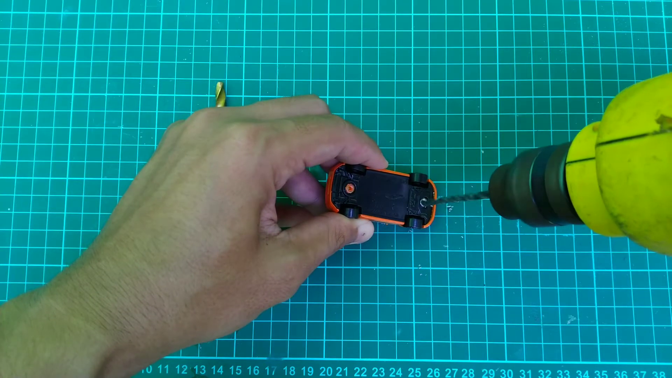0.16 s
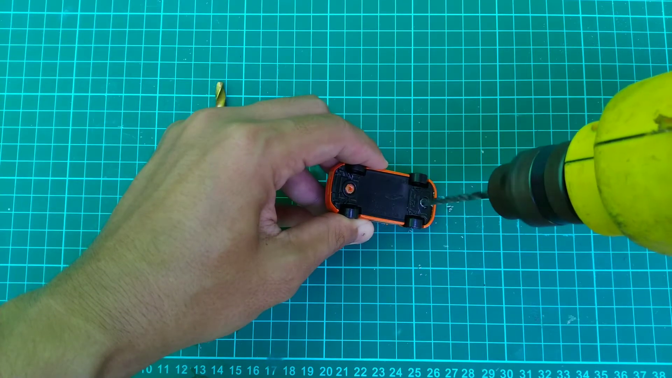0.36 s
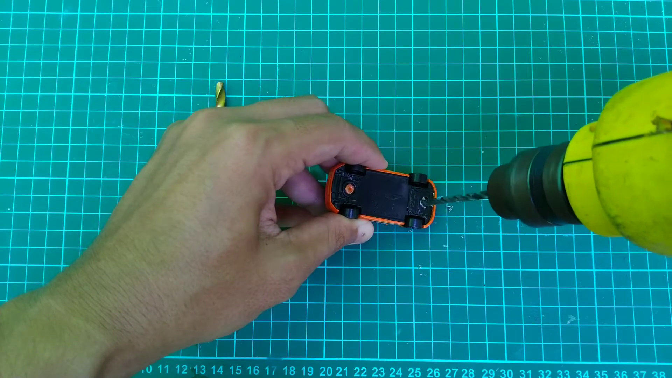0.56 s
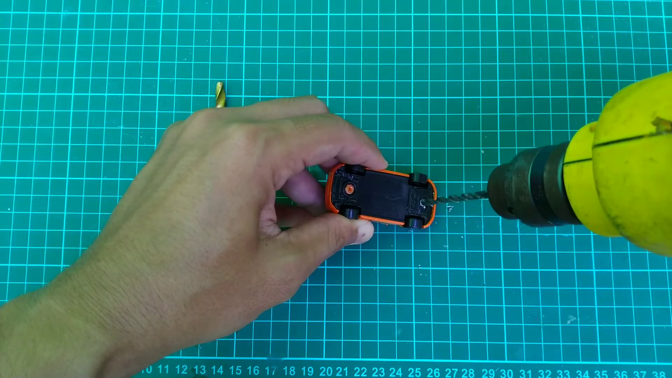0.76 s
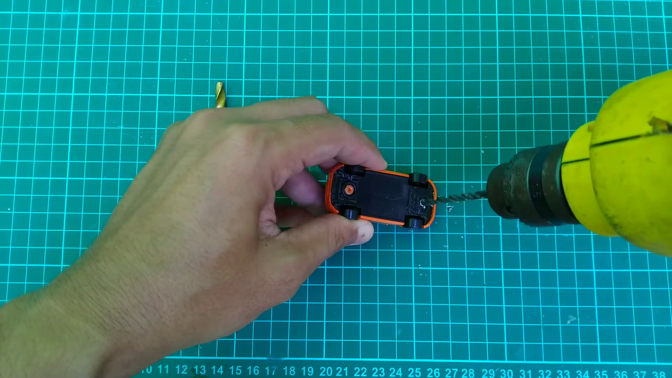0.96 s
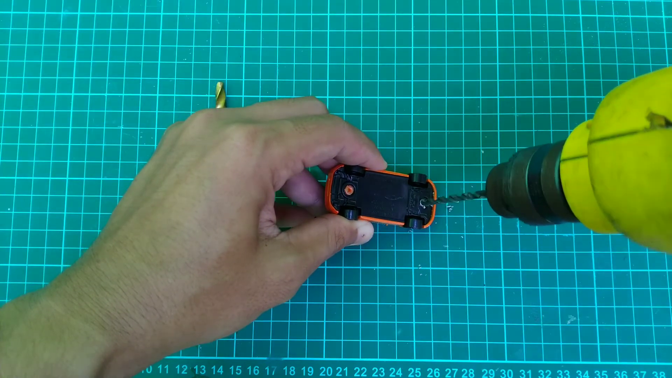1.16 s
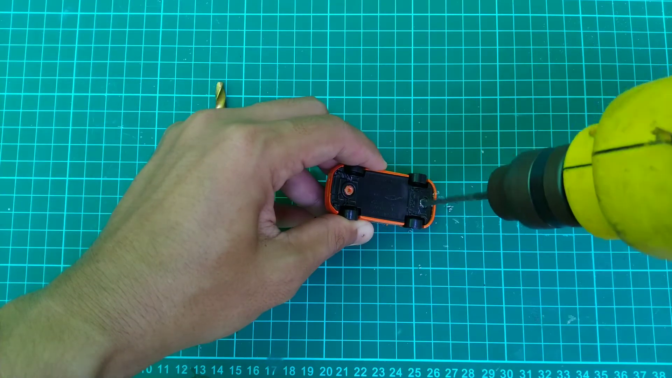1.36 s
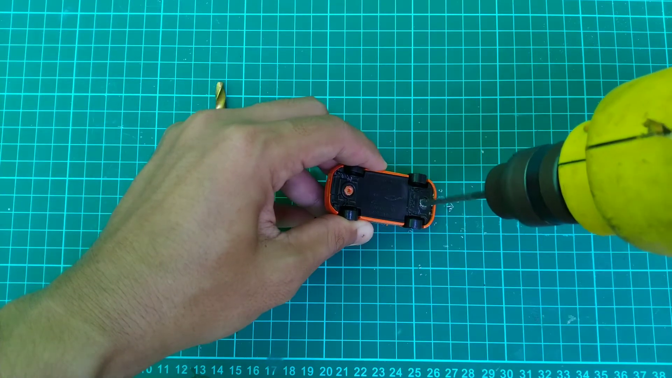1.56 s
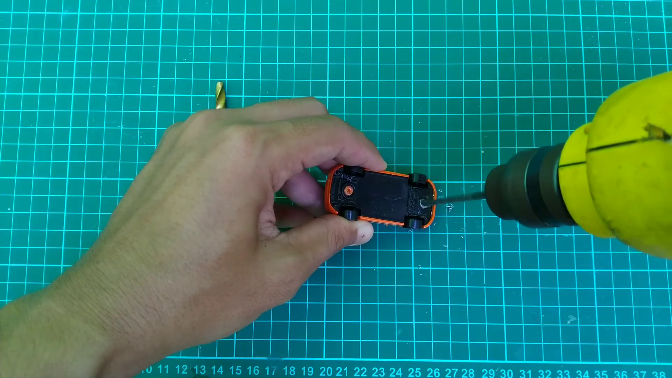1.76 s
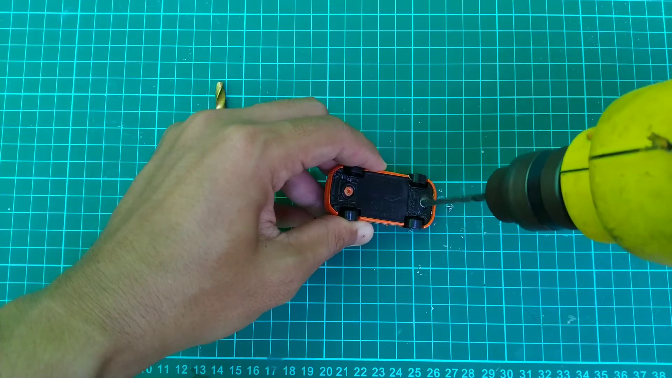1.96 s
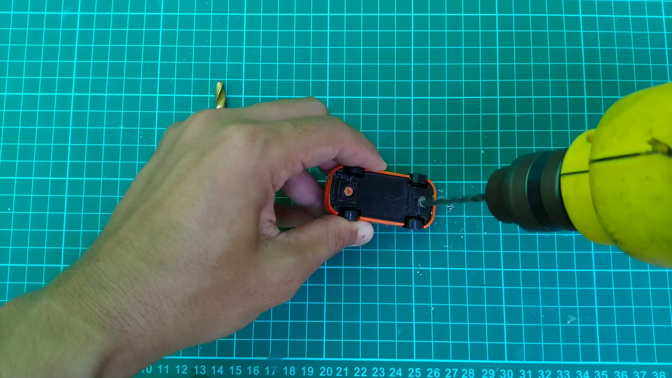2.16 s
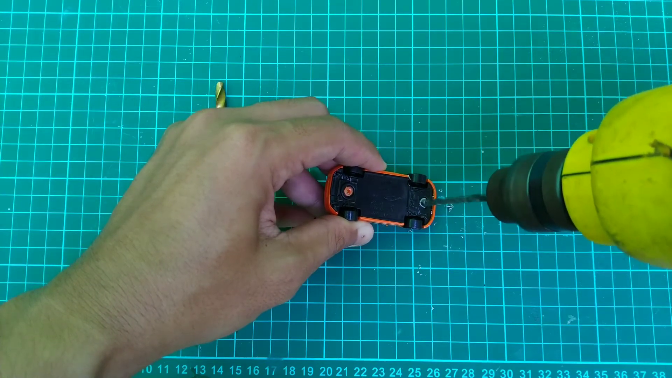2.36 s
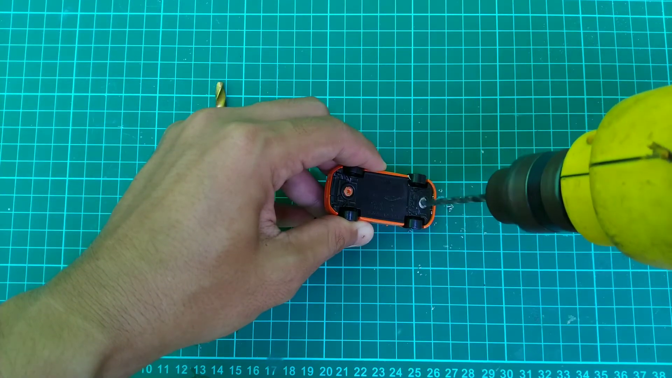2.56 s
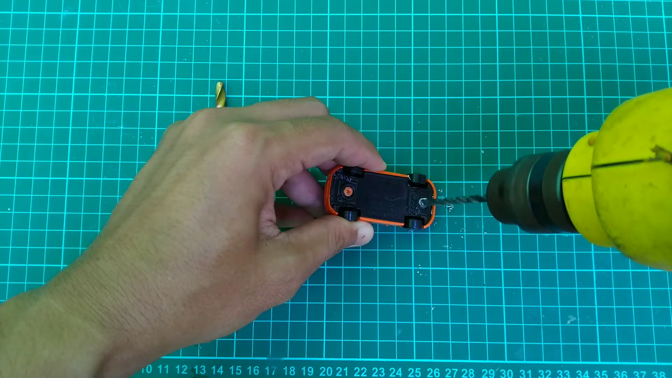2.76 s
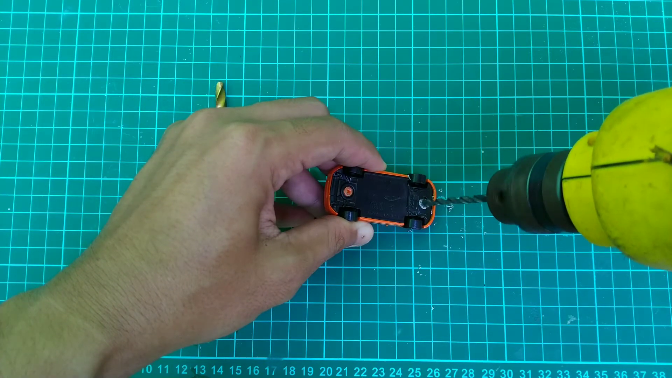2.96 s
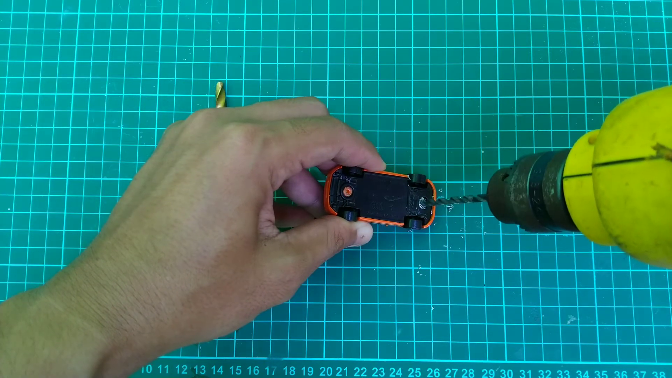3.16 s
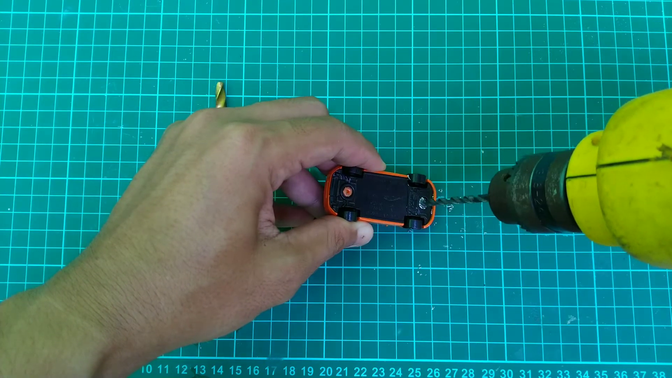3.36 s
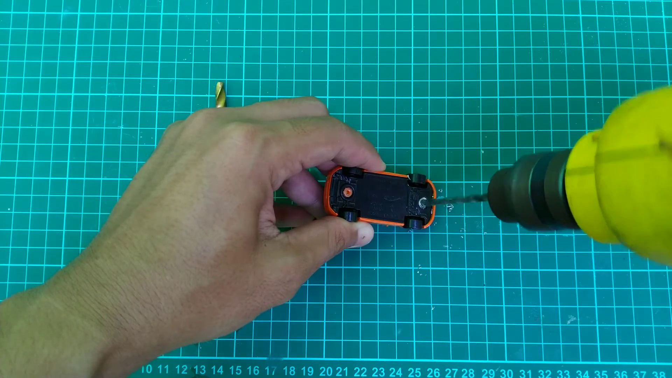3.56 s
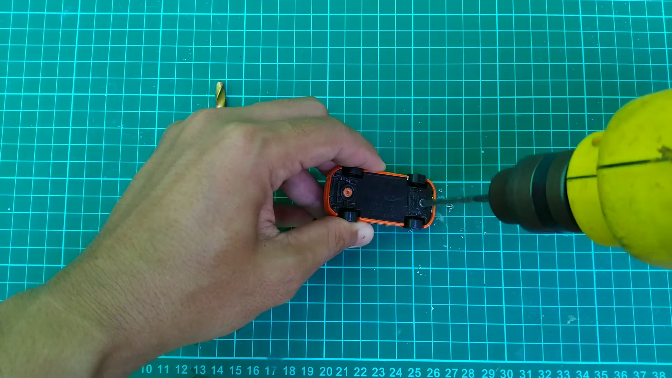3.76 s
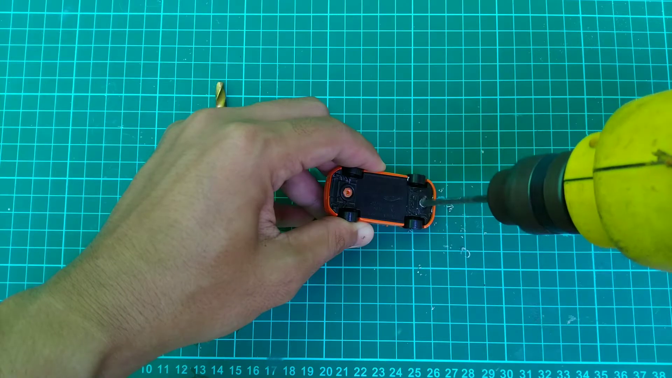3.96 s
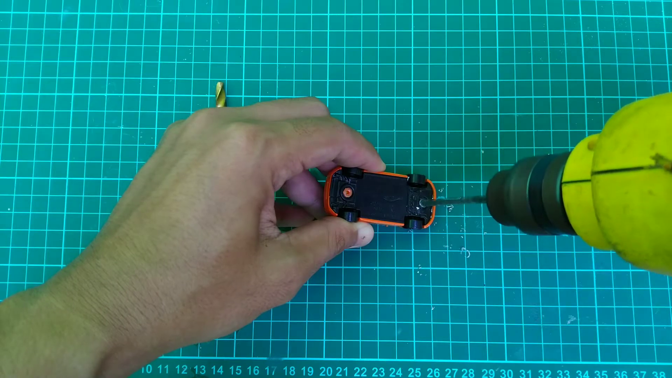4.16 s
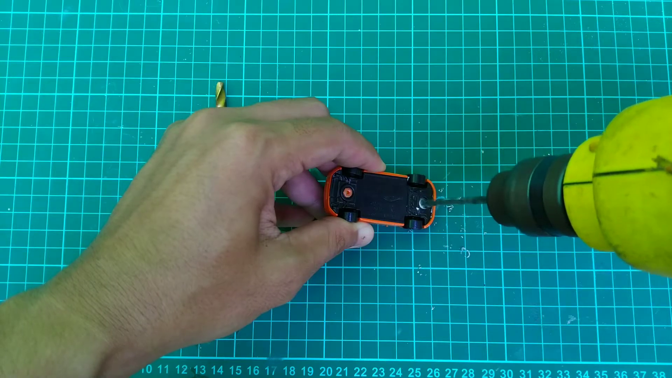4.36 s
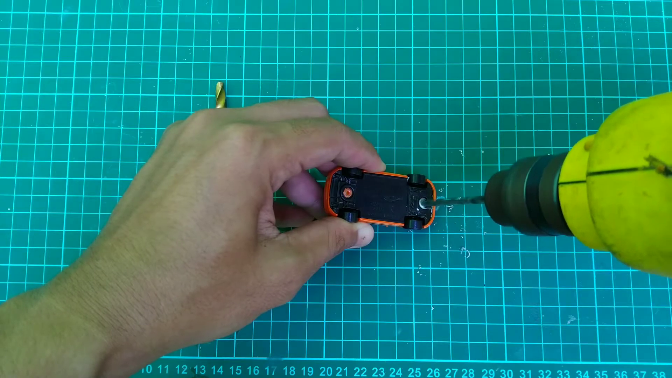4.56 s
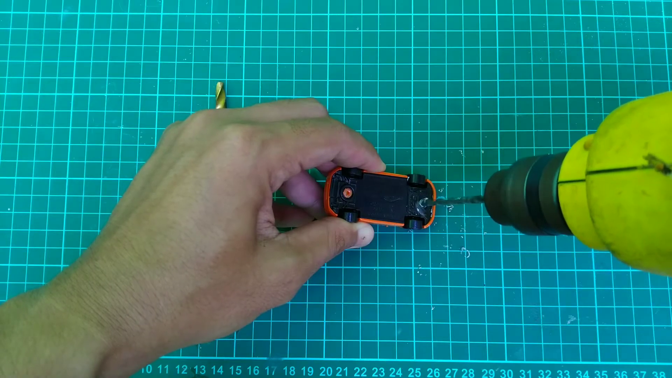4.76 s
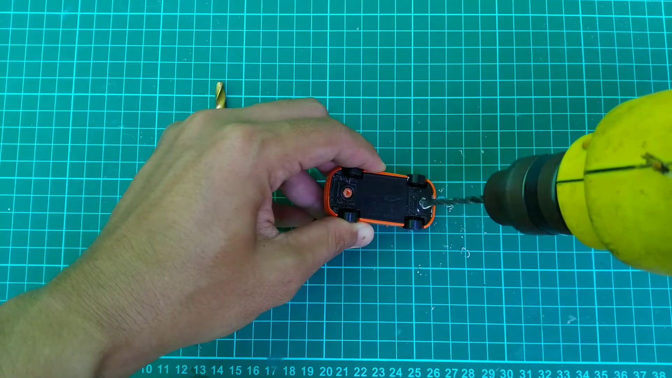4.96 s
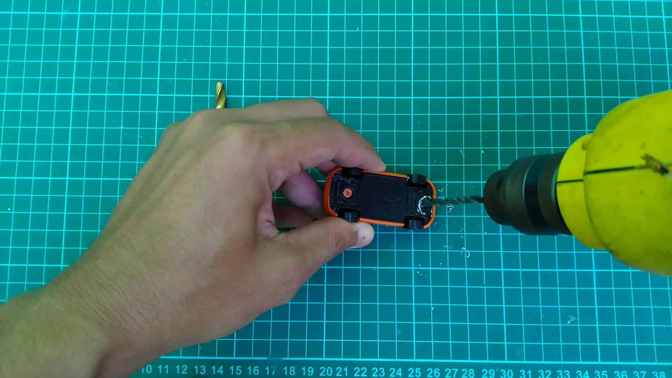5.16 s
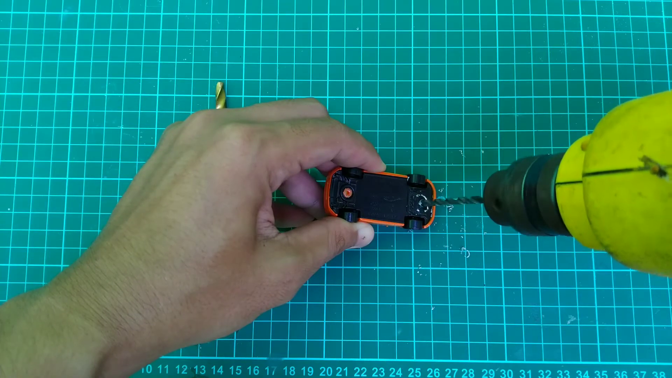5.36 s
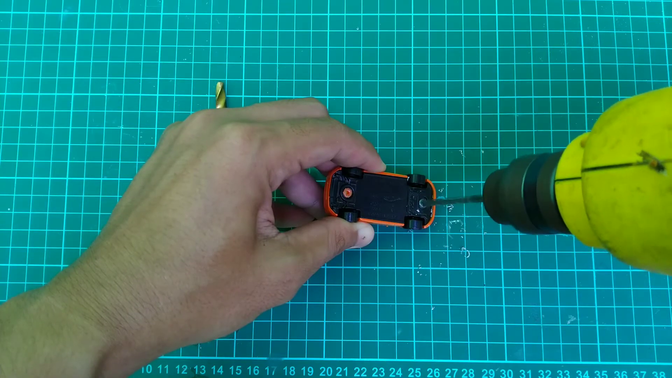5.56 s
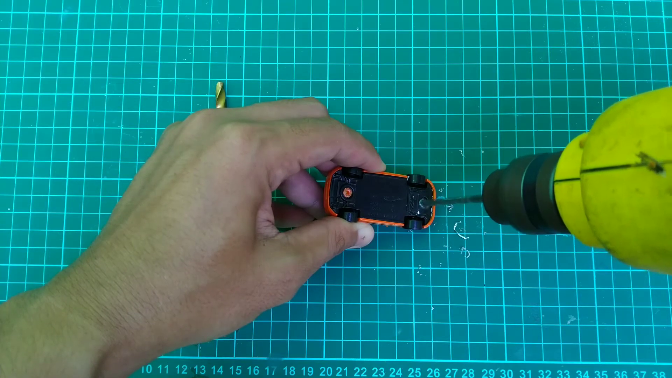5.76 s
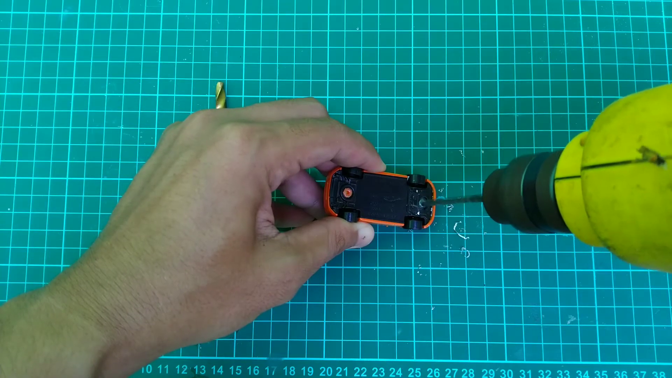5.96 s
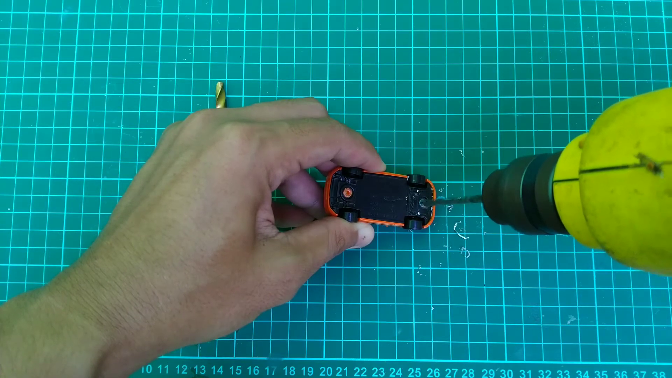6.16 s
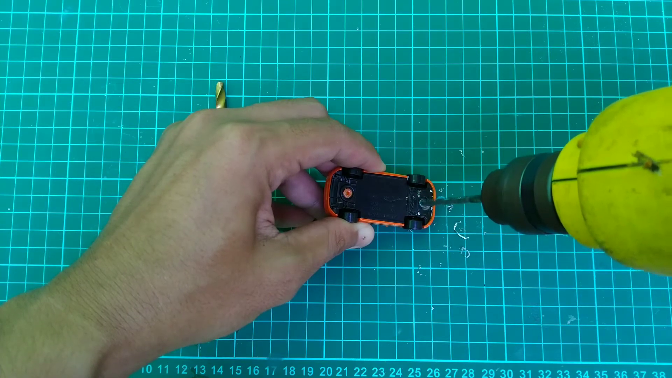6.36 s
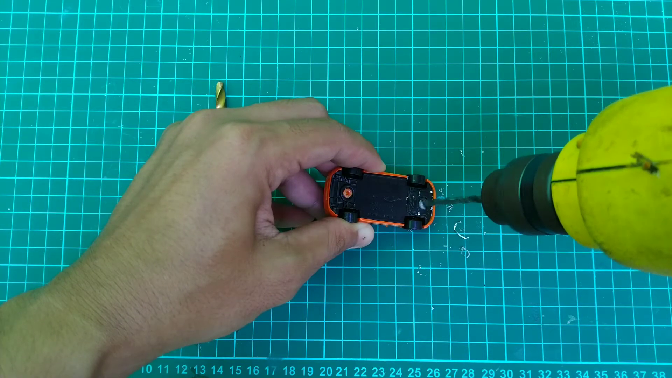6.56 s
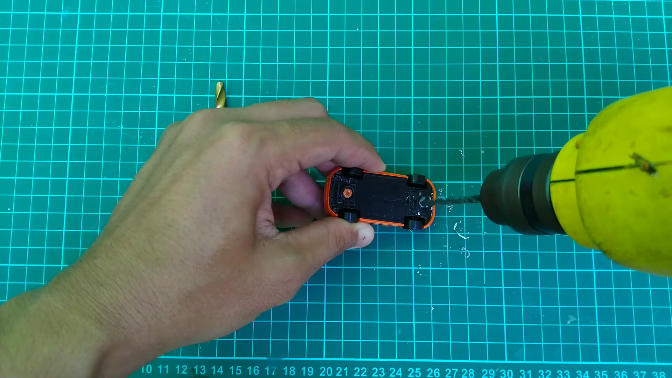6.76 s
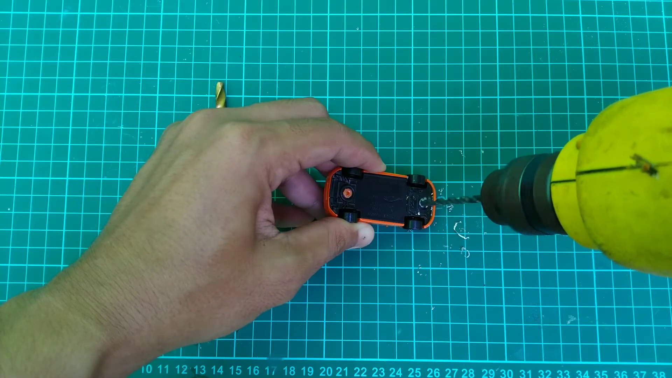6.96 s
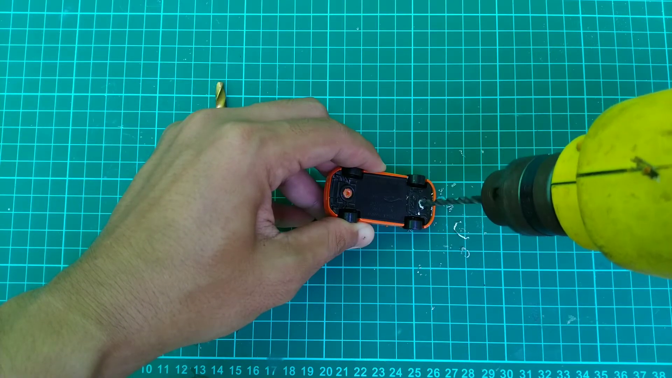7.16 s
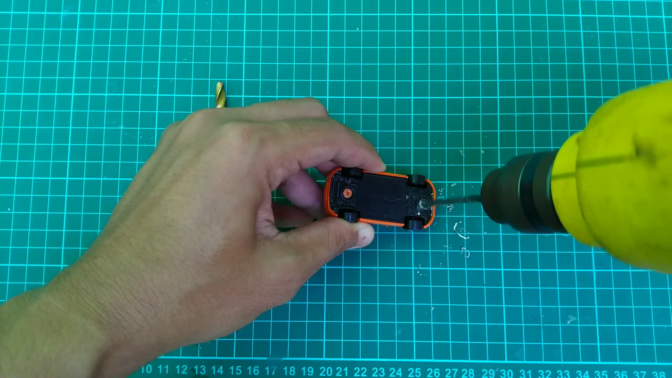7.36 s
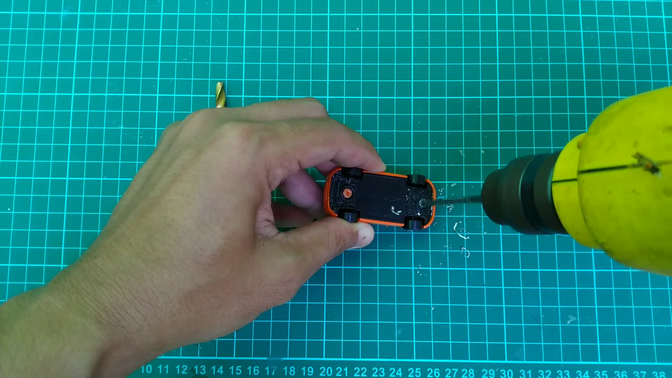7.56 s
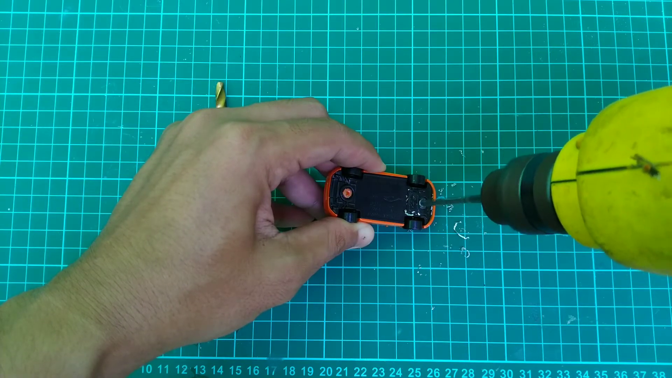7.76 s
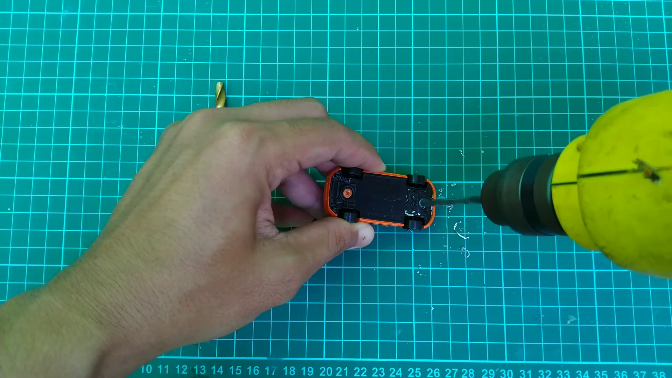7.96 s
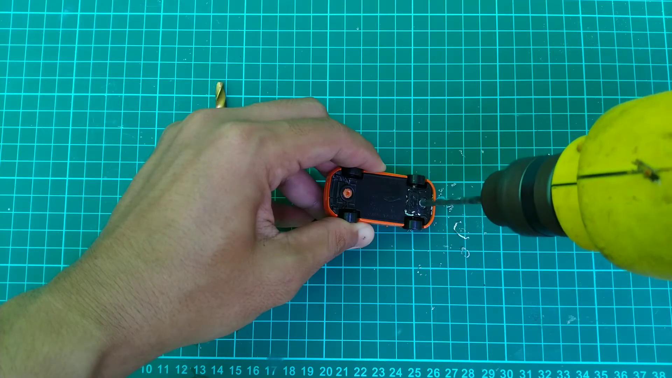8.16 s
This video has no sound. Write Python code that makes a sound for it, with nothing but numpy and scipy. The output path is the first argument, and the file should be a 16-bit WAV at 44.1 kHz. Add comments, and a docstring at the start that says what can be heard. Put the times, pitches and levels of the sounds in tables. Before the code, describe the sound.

A small electric drill is blipped four times, whining and rasping down each time as it cuts a toy car's rivet.

```python
"""A falling whine comes first: a small mains drill is coasting to rest on a work table, close to a phone.
It is then blipped four times and left to coast while its bit cuts a rivet. Tooth contact excites the
case at multiples of the shaft speed, over rasping gears and fan hiss. A low room hum lies underneath.
Trigger and chuck ticks ring the grip before each start, and the armature howls while current flows."""
import sys
import numpy as np
from scipy import signal
from scipy.fft import rfft, irfft, next_fast_len
from scipy.io import wavfile
from scipy.ndimage import uniform_filter1d, map_coordinates

SR = 44100
rng = np.random.default_rng(int(sys.argv[2]) if len(sys.argv) > 2 else 0)


def put_to_file(sound):
    """Save the sound as 16-bit audio at rate SR, in the file named by the first command-line argument."""
    columns = np.atleast_2d(sound).T  # one column per channel
    safe = np.clip(columns, -1, 1)
    whole_steps = np.round(safe * 32767)
    wavfile.write(sys.argv[1], SR, whole_steps.astype(np.int16))


N = 362061
TEETH, MAINS_HZ, TOP_HZ = 6, 50, 15750  # tooth contacts per shaft turn, supply frequency, band limit

# Trigger pulls. Each row: start, release and motor at rest in seconds; relative levels of the starting
# jolt and the rasp in dB; dip as the gears go slack in dB; recovery time in seconds.
PULLS = [(1.253, 1.388, 3.195, -31.5, -17.5, -3.5, 0.24), (3.636, 3.788, 5.5, -27.5, -17, -4, 0.035),
         (5.551, 5.682, 7.31, -31.5, -17, -2, 0.031), (7.387, 7.528, 9.17, -25.5, -17, -2.5, 0.057)]


def amp(db):
    """Decibels as an amplitude ratio."""
    return 10 ** (np.asarray(db) / 20)


def unit(x):
    """Normalisation to an rms of one."""
    return x / np.sqrt(np.mean(x ** 2) + 1e-20)


def along(points, hz, column=1):
    """Interpolation of one table column on a logarithmic frequency axis."""
    table = np.array(points, float)
    return np.interp(np.log(hz + 1), np.log(table[:, 0] + 1), table[:, column])


def wobble(rate):
    """Smooth random modulation: a spline through rate knots a second."""
    return map_coordinates(rng.standard_normal(int(N * rate / SR) + 4), [np.arange(N) * rate / SR])


def filtered(x, response):
    """Linear filtering: the spectrum of x times a complex frequency response."""
    size = next_fast_len(N + SR // 2)
    return irfft(rfft(x, size) * response(np.fft.rfftfreq(size, 1 / SR)), size)[..., :N]


def patchy(channels, depth_db):
    """White noise modulated in random patches of time and frequency."""
    spectra = signal.stft(rng.standard_normal((channels, N)), nperseg=512)[2]
    field = uniform_filter1d(uniform_filter1d(rng.standard_normal(spectra.shape[1:]), 6, 0), 8, 1)
    return unit(signal.istft(spectra * amp(depth_db * unit(field)), nperseg=512)[1][:, :N])


def motor():
    """Inertia smooths spin-up and coast: mesh rate in Hz, spin-up progress and torque (0 if coasting)."""
    # One list per coast. Each point: time in seconds, mesh frequency in Hz.
    coasts = [
        [(0, 525), (.17, 420), (.45, 252)],
        [(1.42, 1212), (1.84, 923), (2.24, 636), (2.63, 372), (2.85, 228)],
        [(3.85, 1276), (4.17, 1025), (4.6, 686), (4.97, 410), (5.17, 264)],
        [(5.7, 1230), (6.1, 912), (6.41, 657), (6.74, 414), (6.97, 250)],
        [(7.54, 1262), (7.73, 1104), (7.95, 923), (8.21, 708)],
    ]
    t = np.arange(N) / SR
    knots = list(coasts[0]) + [(.84, 0)]  # the opening coast comes to rest
    for (on, off, rest, *_), coast in zip(PULLS, coasts[1:]):
        (t0, hz0), (t1, hz1) = coast[:2]
        release_hz = hz0 + (hz1 - hz0) / (t1 - t0) * (off - t0)
        knots += [(on, 0), (off, release_hz)] + list(coast) + [(rest, 0)]
    mesh = np.interp(t, *np.transpose(knots))
    progress, torque = np.zeros((2, N))
    for on, off, *_ in PULLS:
        up = (t >= on) & (t < off)
        rise = 1 - np.exp(-(t[up] - on + .002) / .08)
        mesh[up] = mesh[round(off * SR) + 1] * rise / rise[-1]
        progress[up] = (t[up] - on) / (off - on)
        beat = np.cos(4 * np.pi * MAINS_HZ * (t[up] - off + .007))  # two torque peaks per mains cycle
        torque[up] = (1 + np.sqrt(progress[up]) * beat) * np.clip(progress[up] / .08, 0, 1)
    return mesh, progress, uniform_filter1d(torque, size=60)


def excitation(mesh, slack_s=.044, handover_s=.027):
    """Amplitude envelopes of rasp, hiss and drone: a jolt, a spin-up, then a decline with speed."""
    # Each row: time since the pull in seconds, rasp in dB re its level, hiss and drone in dB re rasp.
    spin_up = [(0.003, -17.5, -7.5, 1), (0.014, -5, -11, 2), (0.04, -0.6, -9.5, -10),
               (0.09, 1.1, -6.5, -16), (0.14, 1.4, -8.5, -14)]
    # Each row: mesh frequency of the coast in Hz, then the same three gains in dB.
    slowing = [(0, -55.5, 0, 10), (49, -33, -10.5, 1), (179, -15.5, -13.5, -4.5), (330, -10.5, -12, -10),
               (517, -7, -10, -10), (708, -4, -9, -18), (902, -1.5, -8, -18), (1250, 1.14, -7, -16)]
    t = np.arange(N) / SR
    hz, *by_speed = np.transpose(slowing)
    after, *by_time = np.transpose(spin_up)
    db = np.array([np.interp(mesh, hz, column) for column in by_speed])
    level_db, jolts = np.full(N, -18.), np.zeros((3, N))
    for on, off, _, jolt_db, run_db, slack_db, recover_s in PULLS:
        started = t >= on
        driven = started * np.clip(1 + (off - t) / handover_s, 0, 1)
        driven_db = np.array([np.interp(t - on, after, column) for column in by_time])
        db += driven * (driven_db - db)
        # the gears lose their load just before the release
        slack = np.exp(-np.where(t < off, ((off - t) / slack_s) ** 4, (t - off) / recover_s))
        level_db[started] = run_db + slack_db * slack[started]
        jolts += started * amp(jolt_db - 60 * np.abs(t - on) / .081 + np.array([[0], [-8], [-8]]))
    rasp_db = level_db + db[0]
    return amp([rasp_db, rasp_db + db[1], rasp_db + db[2]]) + jolts


def shaft_order(multiple, turns):
    """A harmonic of the shaft rotation, at a random phase."""
    return np.sin(2 * np.pi * (multiple * turns + rng.random()))


def tilt_db(mesh):
    """Spectral tilt per shaft order: high harmonics fade first as the motor slows."""
    return -.9 * np.log(np.minimum(mesh / 1050, 1) + .01) ** 2


def gear_whine(mesh, turns, clearest_hz=850):
    """Periodic tooth contact gives a harmonic series, which recedes into the rasp at high speed."""
    # Each row: multiple of the shaft speed, relative level in dB.
    orders = [(1, -17), (3, -24), (6, -14), (9, -23), (12, -13), (18, -16), (22, -20), (24, -12.5),
              (25, -21), (27, -22), (28, -19), (30, -20), (31, -21), (34, -22), (36, -20), (43, -21)]
    tilt = tilt_db(mesh)
    cover_db = -20 * np.log(np.maximum(mesh / clearest_hz, 1)) ** 2
    return amp(cover_db) * sum(amp(db + max(k - 12, 2) * tilt + 2 * wobble(18)) * shaft_order(k, turns)
                               for k, db in orders)


def backlash(mesh, turns, coasting, knocks_per_turn=6):
    """Impacts across the tooth clearance modulate the noise, standing out as the motor slows."""
    beats = knocks_per_turn * turns
    since_s = (beats % 1) * TEETH / knocks_per_turn / (mesh + 1)
    strength = amp(3 * rng.standard_normal(int(beats[-1]) + 2))[beats.astype(int)]
    knocks = 1 + 4 * strength * np.exp(-since_s / .0015) * np.exp(-mesh / 200) * coasting
    grit = knocks * amp(.83 * wobble(600) + .61 * wobble(40))
    return grit / np.sqrt(uniform_filter1d(grit ** 2, size=4000))


def case_resonance_db(hz):
    """The modes of the case add narrow peaks to its response."""
    # Each row: centre in Hz, bandwidth in Hz, peak height in dB.
    modes = [(547, 60, 8), (720, 40, 3), (1670, 110, 3.5), (2090, 150, 6), (3130, 130, 4), (4850, 300, 2.5)]
    return sum(db / (1 + (2 * (hz - centre) / width) ** 2) for centre, width, db in modes)


def path_phase(hz, ear):
    """Propagation through case and air delays the right microphone (ear 1) behind the left (ear 0)."""
    # Each row: frequency in Hz, phase lag in radians.
    lags = [(0, 0), (500, .4), (1000, 2.1), (1460, 3), (2670, 9.5), (4820, 18.8), (8000, 31)]
    return np.exp(-1j * ear * np.interp(hz, *np.transpose(lags)))


def case_radiation(shake, sway, mesh, ear):
    """Forced vibration: the case radiates shake as middle and treble rasp, sway as a low drone."""
    # Response toward each microphone. Each row: frequency in Hz, relative gain in dB.
    left = [(100, -20.5), (400, -17.5), (550, -12.5), (800, -10.5), (1100, -9), (1350, -10.5), (1680, -0.5),
            (1900, -8), (2150, -4), (2500, -3), (3100, -5), (4000, -15), (4900, -3.5), (6500, -8.5),
            (7500, -27.5)]
    right = [(100, -24), (400, -19.5), (550, -16), (800, -10.5), (1100, -10.5), (1500, -10), (1850, -4.5),
             (2120, -1), (2400, -6.5), (2700, 0), (3150, -6), (4150, -3), (5000, -9.5), (6500, -11.5),
             (7500, -37.5)]
    colour = lambda hz: unit(amp(along((left, right)[ear], hz) + case_resonance_db(hz) - 60 * (hz > 8000)))
    low = lambda hz: 1 / (1 + (hz / 1300) ** 8)
    high = lambda hz: 1 - 1 / (1 + (hz / 3800) ** 6)
    bright = ((mesh + 150) / 950) ** .34  # faster teeth strike brighter
    middle = filtered(shake / bright, lambda hz: colour(hz) * (1 - low(hz)) * (1 - high(hz)))
    treble = filtered(shake * bright, lambda hz: colour(hz) * high(hz))
    bass = filtered(sway, lambda hz: colour(hz) * low(hz))
    return .83 * (middle + treble) + amp(12) * bass


def fan_tones(mesh, turns):
    """Rotation puts thin harmonics into the hiss of the fan."""
    # Each row: multiple of the shaft speed, level in dB re the hiss.
    orders = [(48, -18), (72, -20)]
    tilt = tilt_db(mesh)
    return sum(amp(db + k * tilt / 2 + 3 * wobble(18)) * shaft_order(k, turns) for k, db in orders)


def fan_hiss(gain, grit, tones, ear):
    """Broadband flow noise and the fan's tones, confined to the high treble."""
    # Each row: frequency in Hz, relative gain to the left and to the right in dB.
    spectrum = [(6780, -25, -21.5), (7200, -18, -1), (9620, -1, -6.5), (10700, 1, -1.5), (12800, 3, -2),
                (13940, 4.5, -6), (16300, -19, -3.5)]
    air = (patchy(channels=1, depth_db=3)[0] * grit ** .37 + tones) * gain
    stopband = lambda hz: (hz < 6500) | (hz > TOP_HZ)
    return filtered(air, lambda hz: unit(amp(along(spectrum, hz, column=ear + 1) - 60 * stopband(hz))))


def drill():
    """Superposition of gears, fan and armature on one shaft, partly coherent between the microphones."""
    mesh, progress, torque = motor()
    rasp, hiss, drone = excitation(mesh)
    turns = np.cumsum(mesh / TEETH) / SR
    coasting = progress == 0
    whine = coasting * gear_whine(mesh, turns)
    howl = armature_howl(turns, progress, torque)
    tones = coasting * fan_tones(mesh, turns)
    grit = backlash(mesh, turns, coasting)
    common, *own = patchy(channels=3, depth_db=1.01) * grit
    out = []
    for ear, gain_db in enumerate((3.2, 2.4)):
        # share: the fraction of the noise power common to both microphones
        coherent = lambda share: filtered(whine + np.sqrt(share) * common, lambda hz: path_phase(hz, ear))
        shake, sway = (coherent(share) + np.sqrt(1 - share) * own[ear] for share in (.35, .8))
        gears = case_radiation(shake * rasp, sway * drone, mesh, ear)
        fan = amp(.45) * fan_hiss(hiss, grit, tones, ear)
        out.append(amp(gain_db) * (gears + howl[ear] + fan))
    return np.array(out)


def room_hum():
    """Partly coherent rumble and wavering tones; the bass is in near antiphase between the channels."""
    # Each row: time in seconds, relative rumble level in dB.
    swell = [(0.0, -49), (0.4, -39.5), (1.5, -42), (2.0, -46), (3.15, -41), (3.6, -48.5), (4.6, -56.5),
             (5.5, -37.5), (6.7, -48), (7.3, -38), (8.21, -47.5)]
    # Each row: frequency in Hz, relative spectral density in dB.
    spectrum = [(15, -34), (25, 9.5), (69, -3.5), (164, -8), (313, -13), (430, -14), (560, -21),
                (850, -34.5), (1380, -38), (6730, -43), (7910, -43), (9050, -47.5), (15500, -40.5)]
    # Each row: frequency in Hz, left-right correlation before the right channel is inverted.
    correlation = [(60, 0.79), (200, 0.93), (600, 0.55), (1300, 0.051)]
    # Each row: frequency of a tone in Hz, relative level in dB.
    drones = [(86, -61), (162, -53), (300, -66)]
    t = np.arange(N) / SR
    angle = lambda hz: np.arccos(np.clip(along(correlation, hz), -1, 1)) / 2
    response = lambda hz: amp(along(spectrum, hz)) * [np.cos(angle(hz)), np.sin(angle(hz))]
    mid, side = filtered(patchy(channels=2, depth_db=-2.5), response)
    rumble = amp(np.interp(t, *np.transpose(swell))) * unit(np.array([mid + side, mid - side]))
    tones = sum(amp(db + 2.8 * wobble(6.2)) * np.sin(2 * np.pi * hz * t + 1.7 * wobble(6.3))
                for hz, db in drones)
    return (rumble + tones) * amp([[.7], [-.7]])


def trigger_ticks(right_lag_samples=17):
    """Impulse excitation: each trigger or chuck tick cracks and rings the modes of the plastic grip."""
    # Each row: start in seconds, relative level in dB.
    ticks = [(.806, -29), (.823, -27.5), (.957, -27.5), (1.08, -31), (1.108, -30.5), (1.221, -28),
             (1.232, -32), (3.479, -30), (3.517, -32.5), (3.548, -33.5), (3.571, -41), (3.596, -36),
             (3.619, -30.5), (5.469, -30), (5.501, -38), (5.518, -32), (7.194, -47.5), (7.209, -38),
             (7.25, -28), (7.31, -47), (7.332, -27), (7.356, -36), (7.375, -33)]
    # Each row: mode frequency in Hz, relative level in dB, time to decay by 60 dB in seconds.
    modes = [(680, -2, .022), (1150, -4, .015), (1630, -1, .016), (2150, -3, .015), (2700, -5, .015),
             (3550, -4, .015), (4100, -8, .012), (5400, -10, .01)]
    out, t = np.zeros((2, N + SR)), np.arange(SR // 10) / SR
    attack = 1 - np.exp(-t / .00047)
    for start, db in ticks:
        for ear in range(2):
            ring = sum(amp(level + rng.normal(0, 3) - 60 * t / t60)
                       * np.sin(2 * np.pi * (hz * t + rng.random())) for hz, level, t60 in modes)
            crack = .9 * amp(-60 * t / .03) * rng.standard_normal(len(t))
            first = round(start * SR) + ear * right_lag_samples
            out[ear, first:first + len(t)] += amp(db - 8) * (ring + crack) * attack
    return out[:, :N]


def armature_howl(turns, progress, torque, cutoff_hz=480):
    """Pulsating torque modulates shaft harmonics, which the case radiates poorly below its cutoff."""
    # Each row: multiple of the shaft speed, relative level in dB at the start and at the release.
    orders = [(12, -23, -28), (18, -32, -38), (24, -27, -35), (36, -31, -38)]
    howl = torque * sum(amp(start + (end - start) * progress ** 2 + 2.5 * wobble(60))
                        * shaft_order(k, turns) for k, start, end in orders)
    radiation = lambda hz: amp(case_resonance_db(hz)) * hz ** 4 / (hz ** 4 + cutoff_hz ** 4)
    return [filtered(howl, lambda hz: path_phase(hz, ear) * radiation(hz)) for ear in range(2)]


def walls(x, t60):
    """Diffuse reverberation: an exponentially decaying tail, independent at each microphone."""
    t = np.arange(SR // 3) / SR
    tail = rng.standard_normal((2, len(t))) * amp(-60 * t / t60) * (t > .004)
    return signal.fftconvolve(x, tail / np.linalg.norm(tail[0]), axes=1)[:, :N]


def scene():
    """The direct sound of the tool, its reverberation and the room hum add linearly."""
    tool = drill() + trigger_ticks()
    return tool + amp(-12) * walls(tool, t60=.31) + room_hum()


def record(dry):
    """The phone acts as a band-pass filter, with a notch near 8 kHz from its sound ports."""
    # The notch: centre in Hz, width in Hz, gain in dB.
    notch = (7875, 444, -14)
    centre, width, db = notch
    ports = lambda hz: amp(db * np.exp(-((hz - centre) / width) ** 2))
    bass_cut = lambda hz: hz ** 4 / (hz ** 4 + 55.0 ** 4)
    top_cut = lambda hz: np.clip((TOP_HZ - hz) / 350, 0, 1) ** 2
    return np.clip(filtered(dry, lambda hz: ports(hz) * bass_cut(hz) * top_cut(hz)), -1, 1)


dry = scene()
out = record(dry)
put_to_file(out)
```